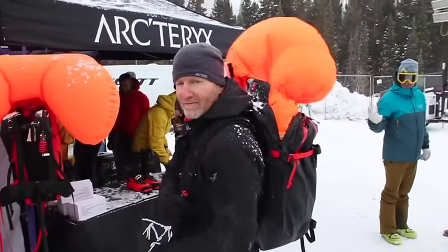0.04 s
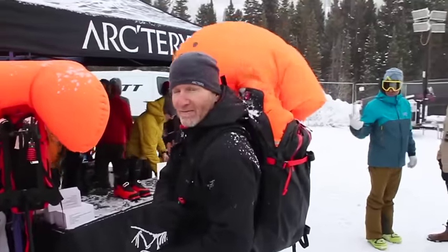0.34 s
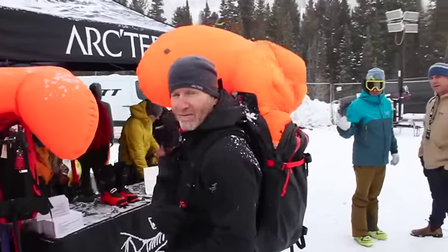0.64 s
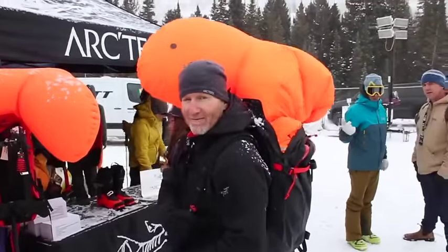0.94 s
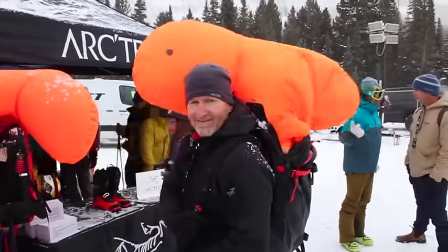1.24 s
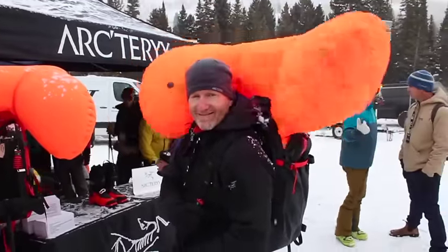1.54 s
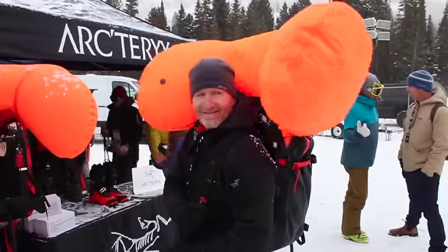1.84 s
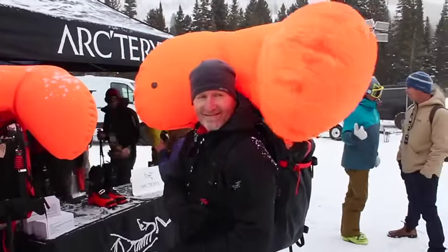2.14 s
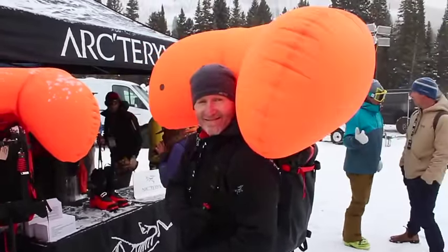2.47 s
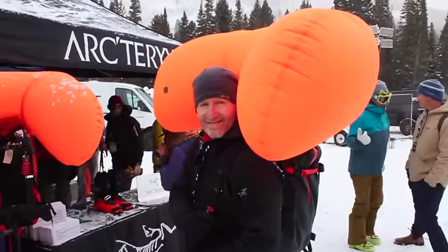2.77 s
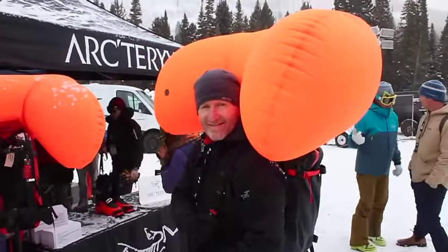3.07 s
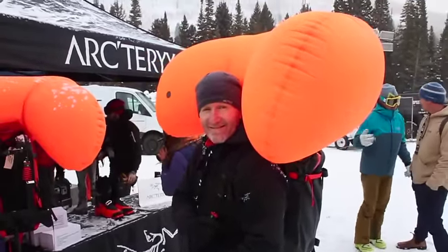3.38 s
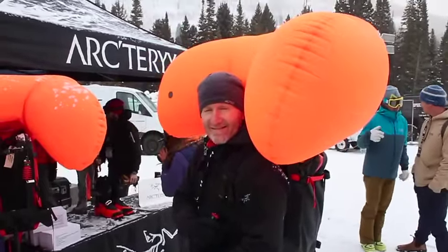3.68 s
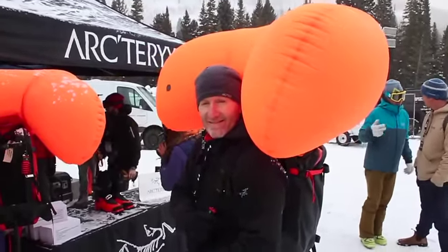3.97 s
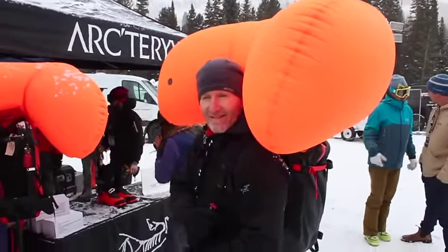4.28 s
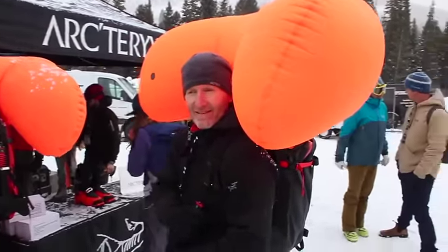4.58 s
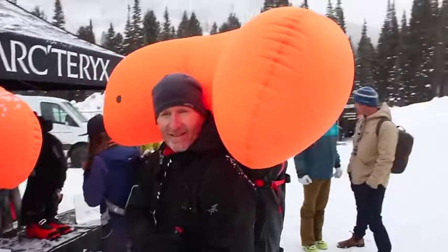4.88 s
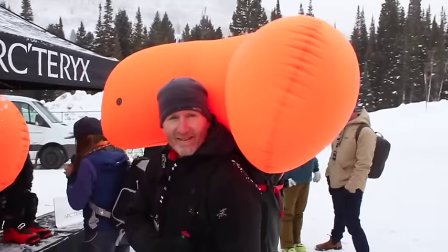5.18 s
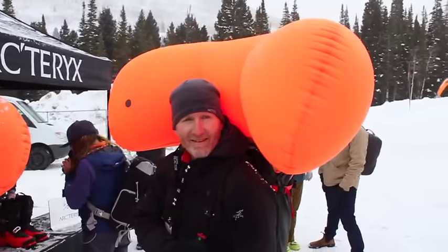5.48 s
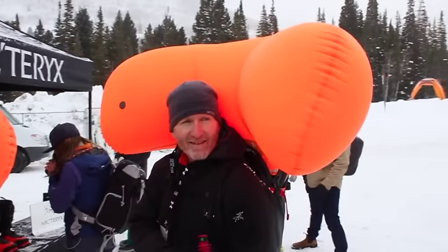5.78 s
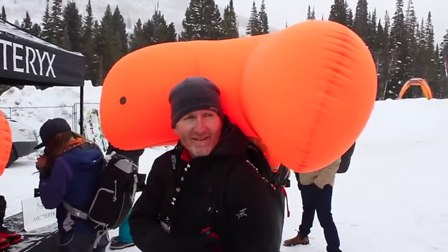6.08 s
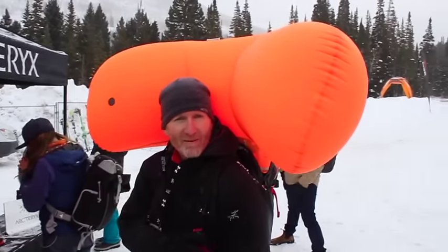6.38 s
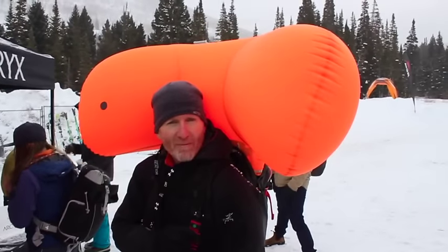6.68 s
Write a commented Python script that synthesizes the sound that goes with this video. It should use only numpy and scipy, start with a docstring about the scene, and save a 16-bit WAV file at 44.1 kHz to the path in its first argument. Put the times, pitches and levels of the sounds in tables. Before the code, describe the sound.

From the start, the small electric fan of an avalanche backpack is already running hard, close by, outdoors with no reverberation. A piercing, fluttering whine and a lower hum hold their pitch over a bright hiss of air jetting into the folded airbag. Hollow, faintly whistling resonances swell and fade in the rush as the bag opens. At about 2.3 seconds the bag is tight and the fan speeds up: the whine climbs, quickly at first and then more slowly, and the airflow becomes smoother, with a slight ring. Near 4.6 seconds the pitch levels off high and wavers a little, while the air turns rougher and churns over a faint low rumble. At about 6.1 seconds the power cuts and the pitch begins to slide down, with the fan still loud when the sound ends at around 6.7 seconds.

```python
"""The seven-blade electric fan of an avalanche backpack blows up its airbag, close by on open snow.
Air jets into the folded bag with a bright hiss and the fan labours: a shaft hum and a piercing,
fluttering blade whine ride on the rush, and cavities in the unfolding bag resonate. At 2.3 s the bag
is tight, the unloaded fan speeds up and the duct rings higher. Near 4.6 s the flow stalls and the fan
churns against the full bag. At 6.1 s the power is cut and it begins to wind down."""
import sys
import numpy as np
from scipy import signal
from scipy.fft import rfft, irfft, next_fast_len
from scipy.io import wavfile
from scipy.ndimage import uniform_filter1d, minimum_filter1d

SR = 44100
rng = np.random.default_rng(int(sys.argv[2]) if len(sys.argv) > 2 else 0)


def wrap_up_sound(samples):
    """Save the sound to the file named by the first command line argument, as 16-bit audio."""
    columns = np.atleast_2d(samples).T
    # keep every value between -1 and 1, then stretch to whole-number steps
    tamed = np.clip(columns, -1, 1)
    steps = np.round(tamed * 32767).astype(np.int16)
    wavfile.write(sys.argv[1], SR, steps)


N = 296342
TIME = np.arange(N) / SR
BLADES, TOP_SPEED_HZ = 7, 1073


# time_s, relative_db
WHINE_LEVEL = [(0.0, -28.5), (0.32, -21), (0.42, -26.5), (0.58, -23), (0.66, -27.5), (0.98, -21),
               (1.26, -28.5), (1.36, -18.5), (1.5, -27), (1.62, -21.5), (1.72, -30), (1.8, -21),
               (2.08, -26.5), (2.26, -21), (2.62, -27), (2.701, -20), (2.84, -23.9), (3.179, -17),
               (3.48, -25), (3.54, -18.5), (3.9, -25), (4.04, -18), (4.14, -32), (4.24, -14), (4.52, -31),
               (4.6, -22.5), (5.62, -16), (6.1, -25.5), (6.32, -15), (6.72, -17.0)]
# time_s, relative_db
OCTAVE_LEVEL = [(0.0, -32), (1.61, -29), (1.94, -33), (2.17, -27.5), (2.52, -36.5), (3.1, -22),
                (3.65, -23.5), (3.96, -19.5), (4.68, -23.5), (6.72, -27.5)]

def blade_whine(shaft_rad, tight, unrest):
    """Blade-pass tone and its octave, roughened by inlet eddies; a third harmonic while the bag fills."""
    (whine_db,), (octave_db,) = in_time(WHINE_LEVEL), in_time(OCTAVE_LEVEL)
    blade_rad = BLADES * shaft_rad
    scatter = .17 + .25 * unrest
    whine = gust_gain(unrest) * tone(blade_rad, scatter, flutter_hz=20)
    octave = gust_gain(unrest + .31) * tone(2 * blade_rad, 2 * scatter, flutter_hz=55)
    third = (1 - tight) * tone(3 * blade_rad, 2.5 * scatter, flutter_hz=90)
    return (from_db(whine_db + 2.6) * whine + from_db(octave_db + 1) * octave
            + from_db(whine_db - 17.5) * third)


def gust_gain(unrest):
    """A blade tone throbs unevenly and dips when gusts break up the inflow, deeper in restless air."""
    waver_db = 1.68 * resonant_noise(pitch_hz=7.4, width_hz=7.4)
    gusts = np.maximum(resonant_noise(pitch_hz=15, width_hz=42), 0)
    dip_db = (5 + 3 * unrest) * gusts
    return from_db(waver_db - dip_db)


# time_s, level_db
HUM_LEVEL = [(0.0, -42.5), (0.2, -33.5), (1.04, -31.5), (1.2, -36.1), (1.38, -31.5), (1.48, -35),
             (2.32, -41.5), (2.46, -28.0), (2.66, -29), (3.08, -21.5), (3.58, -30.2), (3.8, -28.5),
             (4.12, -23.5), (5.56, -23), (5.7, -30.5), (5.76, -23.5), (6.44, -27), (6.54, -23),
             (6.72, -25.6)]
# harmonic, filling_db, tight_db
SHAFT_OVERTONES = [(2, -34, -54), (3, -37, -46), (4, -35.5, -53), (5, -42.5, -53), (6, -42, -40)]

def shaft_hum(shaft_rad, tight):
    """One cycle per turn, with weak overtones that change as the bag tightens."""
    hum_db, = in_time(HUM_LEVEL)
    hum = from_db(hum_db) * tone(shaft_rad, scatter=.17, flutter_hz=16)
    for harmonic, filling_db, tight_db in SHAFT_OVERTONES:
        level_db = filling_db + (tight_db - filling_db) * tight
        hum += from_db(level_db) * tone(harmonic * shaft_rad, scatter=.45, flutter_hz=3.9)
    return hum


# time_s, speed_hz
LABOURING_SPEED = [(0.0, 730.2), (0.18, 720.9), (0.85, 720.3), (1.24, 736.3), (1.46, 719.8), (1.5, 711.1),
                   (1.69, 703.8), (2.2, 708.2), (2.32, 726.0)]
# time_s, speed_hz
HUNTING_SPEED = [(4.7, 1047.6), (4.84, 1035.1), (4.94, 1040.8), (5.0, 1047.9), (5.08, 1042.0),
                 (5.18, 1052.8), (5.6, 1041.0), (5.72, 1044.4), (5.76, 1056.5), (5.82, 1048.1),
                 (6.12, 1054.1)]

def rotor_speed(full_s=2.33, stall_s=4.7, off_s=6.12):
    """The rotor labours under load, spins up once relieved, hunts against the full bag, winds down."""
    spin_up_s, leap_s, leap_hz = .98, .21, 25
    (labouring_hz,), (hunting_hz,) = in_time(LABOURING_SPEED), in_time(HUNTING_SPEED)
    since_full_s, since_off_s = np.maximum(TIME - full_s, 0), np.maximum(TIME - off_s, 0)
    climb_hz = (TOP_SPEED_HZ - leap_hz - labouring_hz) * (1 - np.exp(-since_full_s / spin_up_s))
    snap_hz = leap_hz * (1 - np.exp(-(since_full_s / leap_s) ** 2))   # the bag snaps taut
    sag_hz = 92 * since_off_s + 246 * since_off_s ** 2
    speed_hz = np.where(TIME < stall_s, labouring_hz + climb_hz + snap_hz, hunting_hz) - sag_hz
    return uniform_filter1d(speed_hz, size=1000, mode="nearest")   # inertia


def shaft_angle(speed_hz, unrest):
    """Angle turned, in radians; the speed wobbles in restless air."""
    wobble = .0011 * unrest * drift(rate_hz=28)
    return 2 * np.pi * np.cumsum(speed_hz * (1 + wobble)) / SR


# start_s, settling_s
FLOW_STAGES = [(2.37, 0.22), (4.53, .24), (6.07, 0.14)]

def flow_states():
    """Tight bag, churning and coasting set in one after another, each rising from 0 to 1."""
    return [1 - np.exp(-np.maximum(TIME - start_s, 0) / settling_s)
            for start_s, settling_s in FLOW_STAGES]


# frequency_hz, relative_db (all four)
FILLING_SPECTRUM = [(550, -72.5), (850, -61), (1050, -58.5), (1400, -51.5), (2000, -56), (2400, -54),
                    (3300, -54), (4150, -56), (5300, -62.5), (7200, -60.5), (10000, -65.5), (11500, -71.5),
                    (13300, -65.5), (15700, -77)]
TIGHT_SPECTRUM = [(680, -70.5), (1000, -59), (1300, -55.5), (2100, -55), (2900, -55.5), (3900, -51),
                  (5200, -57.5), (6800, -58.5), (9600, -60.5), (11500, -69), (13500, -60.5), (15700, -71)]
CHURNING_SPECTRUM = [(650, -70), (900, -60), (1190, -62), (1480, -50.5), (2150, -54.5), (2600, -59.5),
                     (3250, -56.5), (3950, -50.5), (5000, -61.5), (6200, -54), (8000, -62), (9700, -61),
                     (11500, -69.5), (13700, -64), (15700, -72)]
COASTING_SPECTRUM = [(720, -70.5), (880, -55.5), (1130, -61.5), (1520, -50), (2000, -58), (2800, -60),
                     (3900, -53), (4700, -66), (6500, -52), (7800, -63.5), (9600, -64), (11500, -71.5),
                     (13400, -64), (15700, -69)]

def air_rush(speed_hz, tight, calm, churn, coast):
    """Turbulence, one colour per flow state; the tight and coasting levels follow rotor speed."""
    speed_octaves = np.log2(speed_hz / TOP_SPEED_HZ)
    filling_db, tight_db = -18.5 + .12 * TIME, -17 + 18.5 * speed_octaves
    churning_db, coasting_db = -16.5, -16 + 8.5 * speed_octaves
    rush = from_db(filling_db) * np.sqrt(1 - tight) * turbulence(FILLING_SPECTRUM)
    rush += from_db(tight_db) * calm * turbulence(TIGHT_SPECTRUM)
    rush += from_db(churning_db) * np.sqrt(tight * churn * (1 - coast)) * turbulence(CHURNING_SPECTRUM)
    rush += from_db(coasting_db) * np.sqrt(coast) * turbulence(COASTING_SPECTRUM)
    return rush


# peak_s, sigma_s, pitch_hz, width_hz, level_db
INFLATION_BANDS = [(.15, 0.71, 13400, 3000, -28.5), (.15, 0.57, 6900, 2500, -29.5),
                   (.1, 0.53, 1810, 200, -28), (.38, 0.074, 2470, 130, -25.5), (0.88, 0.18, 1452, 28, -35),
                   (0.995, 0.14, 2580, 260, -27), (1.112, 0.29, 2960, 302, -26.5),
                   (2.1, 0.6, 1916, 260, -25.5), (2.3, 0.36, 4130, 320, -28),
                   (2.547, 0.18, 3530, 300, -27.5), (2.638, 0.24, 2750, 600, -27)]

def inflation_swells():
    """Noise bands swell and fade. 13400 and 6900 Hz: early hiss of air jetting into the folded bag.
    1452 Hz: a brief whistle at the hum's second harmonic. The rest: cavities in the opening folds."""
    bands = np.zeros(N)
    for peak_s, sigma_s, pitch_hz, width_hz, level_db in INFLATION_BANDS:
        swell = np.exp(-((TIME - peak_s) / sigma_s) ** 2 / 2)
        bands += from_db(level_db) * swell * resonant_noise(pitch_hz, width_hz)
    return bands


# pitch_hz, width_hz, relative_db
DUCT_MODES = [(1536, 56, -11), (1852, 136, -11.5), (2068, 160, -11.5), (2370, 84, -19)]

def duct_ring(tight, calm, stretch_s=2.38, glide_s=.0598):
    """Duct resonances glide up as the bag stretches and ring most in nearly still air."""
    slack = .5 - .5 * np.tanh((TIME - stretch_s) / (2 * glide_s))
    ringing = sum(from_db(relative_db) * resonant_noise(pitch_hz, width_hz)
                  for pitch_hz, width_hz, relative_db in DUCT_MODES)
    pitch_ratio = 1 - .07 * slack
    gliding = np.interp(np.cumsum(pitch_ratio), np.arange(N), ringing)
    drive = calm + from_db(-10) * (1 - tight)
    return from_db(-20) * drive * gliding


# frequency_hz, relative_db
RUMBLE_SPECTRUM = [(34, -16), (48, -3), (68, -13), (110, -9.5), (160, 0), (205, 0), (265, -0.5),
                   (350, -3.5), (430, 2.5), (560, -0.5), (750, -3.5), (1100, -22)]
# time_s, relative_db
RUMBLE_ENVELOPE = [(0.0, -40.5), (0.42, -39.5), (0.52, -43.2), (2.28, -46), (2.46, -50.0), (2.82, -50.0),
                   (4.59, -46.5), (4.65, -43.0), (6.43, -41.0), (6.72, -51.0)]

def flow_rumble():
    """Low turbulence under the rush."""
    rumble_db, = in_time(RUMBLE_ENVELOPE)
    return from_db(rumble_db + 1.5) * turbulence(RUMBLE_SPECTRUM)


# delay_s, gain_db
REFLECTIONS = [(.0042, -23), (.0054, -22), (.0091, -14.5), (0.0144, -22)]

def reflect(sound):
    """Short echoes off snow and bag comb the sound, making it slightly hollow."""
    return sound + sum(from_db(gain_db) * np.interp(TIME - delay_s, TIME, sound, left=0)
                       for delay_s, gain_db in REFLECTIONS)


def tone(phase_rad, scatter, flutter_hz):
    """Tone of rms 1; eddies scatter a share of it, so level and phase flutter."""
    eddies = (drift(flutter_hz) + 1j * drift(flutter_hz)) / np.sqrt(2)
    return np.sqrt(2 / (1 + scatter ** 2)) * np.real((1 + scatter * eddies) * np.exp(1j * phase_rad))


def turbulence(spectrum):
    """Noise of a given colour, rolled off below its lowest point, rms 1."""
    size = next_fast_len(N)
    bins_hz = np.arange(size // 2 + 1) * SR / size + 1
    points_hz, points_db = np.transpose(spectrum)
    gain = from_db(np.interp(np.log(bins_hz), np.log(points_hz), points_db))
    gain *= np.minimum(bins_hz / points_hz[0], 1) ** 2
    return unit_rms(irfft(rfft(rng.standard_normal(size)) * gain, size)[:N])


def resonant_noise(pitch_hz, width_hz):
    """Noise twice through one resonance, rms 1."""
    radius = np.exp(-np.pi * width_hz / SR)
    section = [1 - radius, 0, radius - 1, 1, -2 * radius * np.cos(2 * np.pi * pitch_hz / SR), radius ** 2]
    return unit_rms(signal.sosfilt([section, section], rng.standard_normal(N)))


def drift(rate_hz):
    """Random wander, mostly below rate_hz, rms 1."""
    size = next_fast_len(N)
    bins_hz = np.arange(size // 2 + 1) * SR / size
    spectrum = rfft(rng.standard_normal(size)) / (1 + (bins_hz / rate_hz) ** 2)
    return unit_rms(irfft(spectrum, size)[:N])


def in_time(rows):
    """One curve per column after time_s."""
    time_s, *columns = np.transpose(rows)
    return [np.interp(TIME, time_s, column) for column in columns]


def from_db(db):
    return 10 ** (np.asarray(db) / 20)


def unit_rms(x):
    return x / np.sqrt(np.mean(np.abs(x) ** 2) + 1e-20)


def scene():
    """Fan tones over buffeted air; no reverberation on open snow, both channels alike."""
    speed_hz = rotor_speed()
    tight, churn, coast = flow_states()
    # the flow is calmest between filling and churning
    unrest = .7 * (1 - tight) + churn
    calm = np.sqrt(tight * (1 - churn))
    shaft_rad = shaft_angle(speed_hz, unrest)
    fan = shaft_hum(shaft_rad, tight) + blade_whine(shaft_rad, tight, unrest)
    airflow = air_rush(speed_hz, tight, calm, churn, coast) + duct_ring(tight, calm)
    buffeting_db = .5 * drift(rate_hz=25)
    airflow = from_db(buffeting_db) * (airflow + flow_rumble())
    sound = fan + reflect(airflow + inflation_swells())
    return np.array([sound, sound])


def record(dry, ceiling_db=-3.5, cutoff_hz=15750):
    """Fast peak limiter, then a steep low-pass."""
    allowed_gain = np.minimum(1, from_db(ceiling_db) / (np.abs(dry) + 1e-9))
    gain = uniform_filter1d(minimum_filter1d(allowed_gain, size=129), size=129)
    lowpass = signal.ellip(12, .1, 90, cutoff_hz, fs=SR, output="sos")
    return signal.sosfilt(lowpass, gain * dry)


dry = scene()
out = record(dry)
wrap_up_sound(out)
```